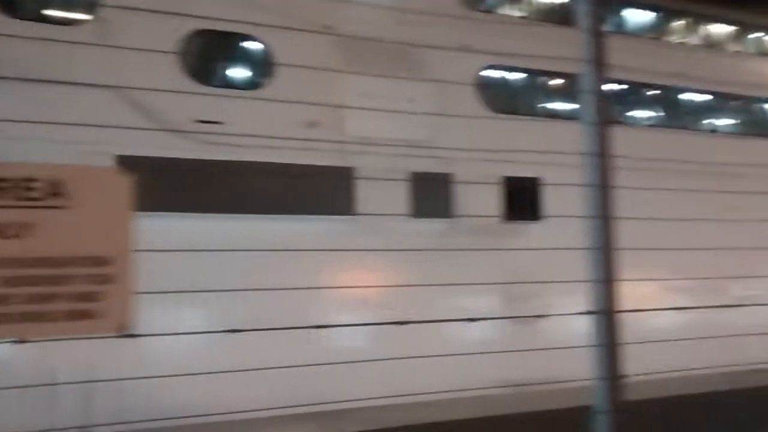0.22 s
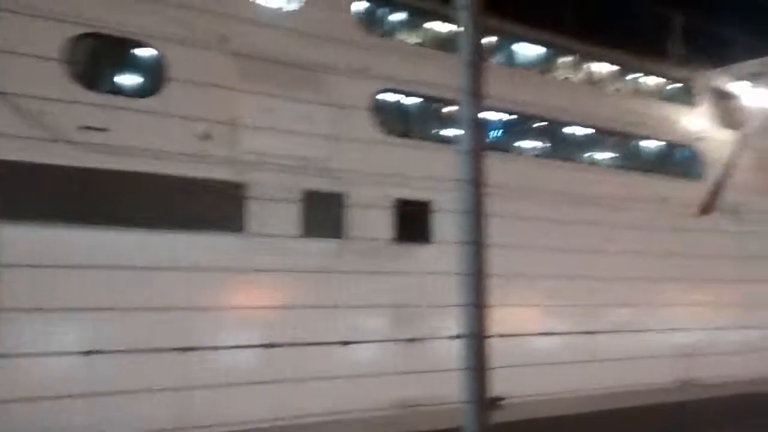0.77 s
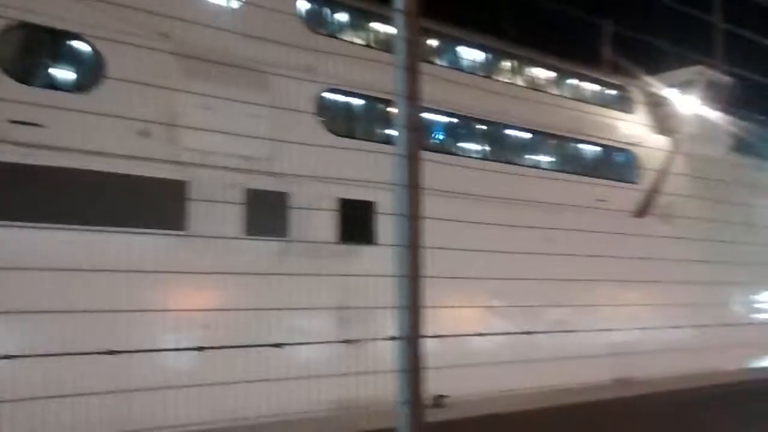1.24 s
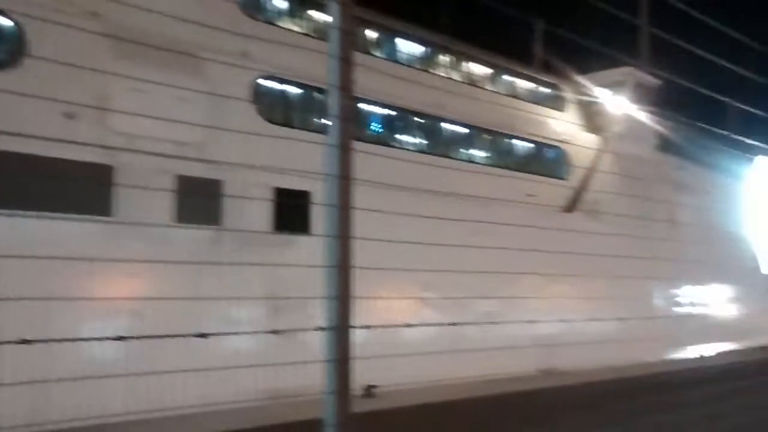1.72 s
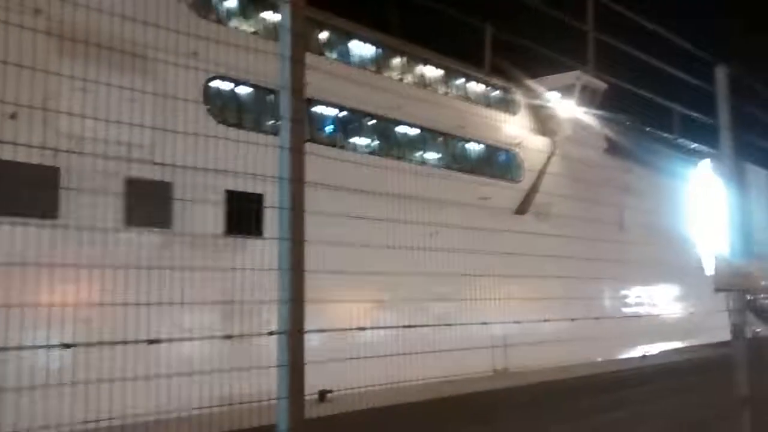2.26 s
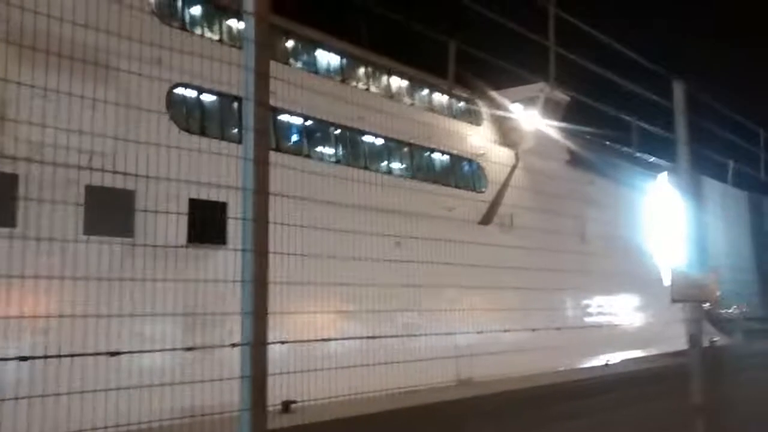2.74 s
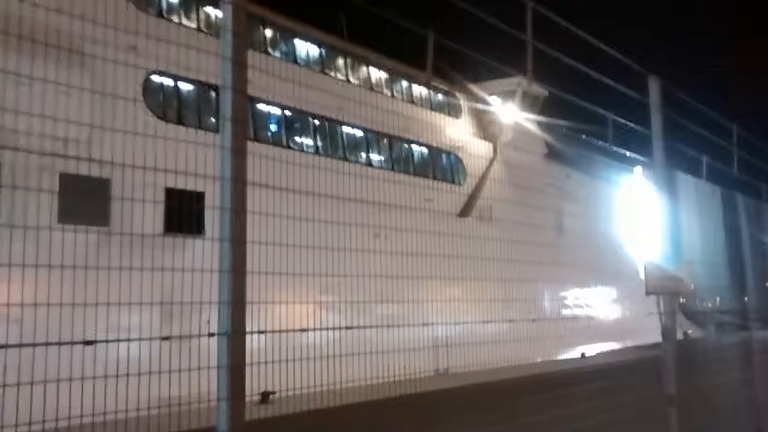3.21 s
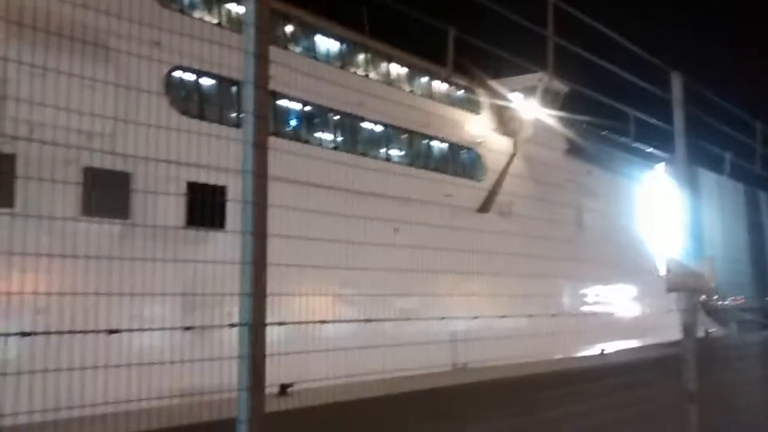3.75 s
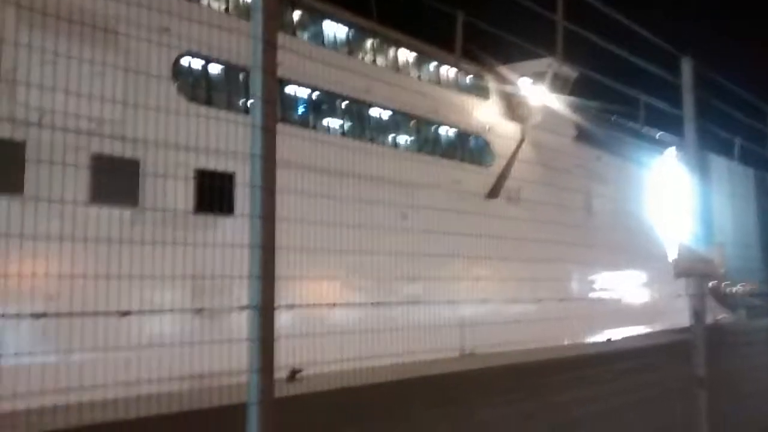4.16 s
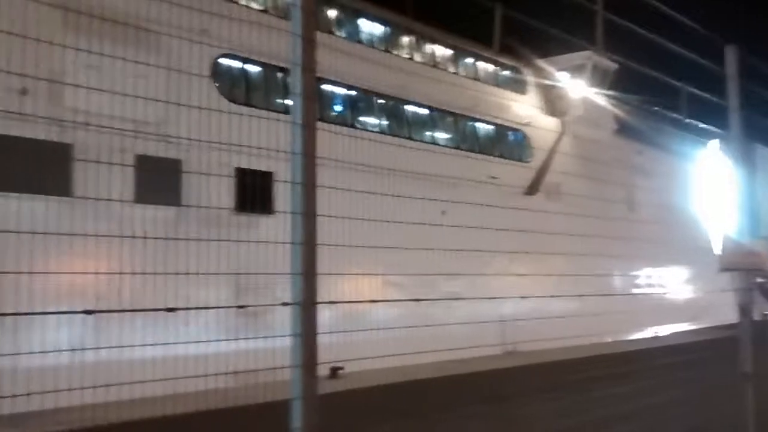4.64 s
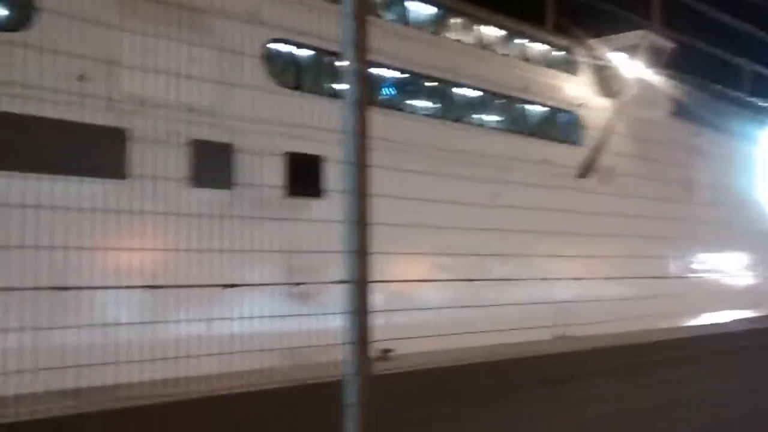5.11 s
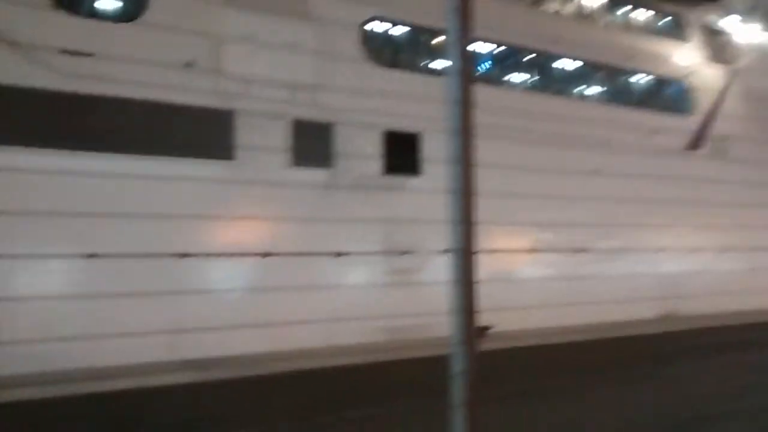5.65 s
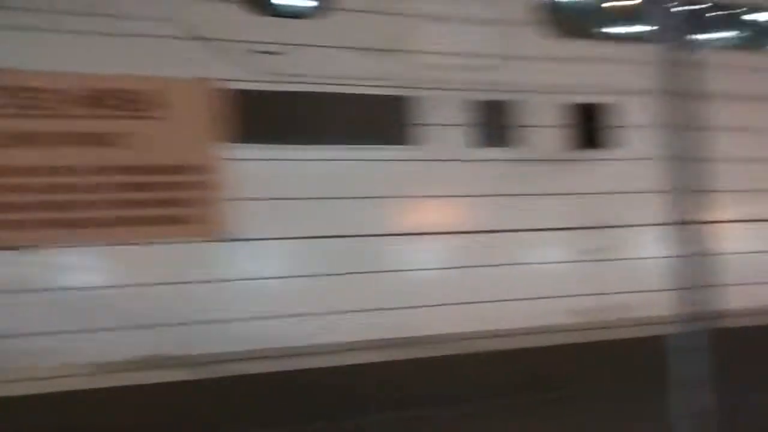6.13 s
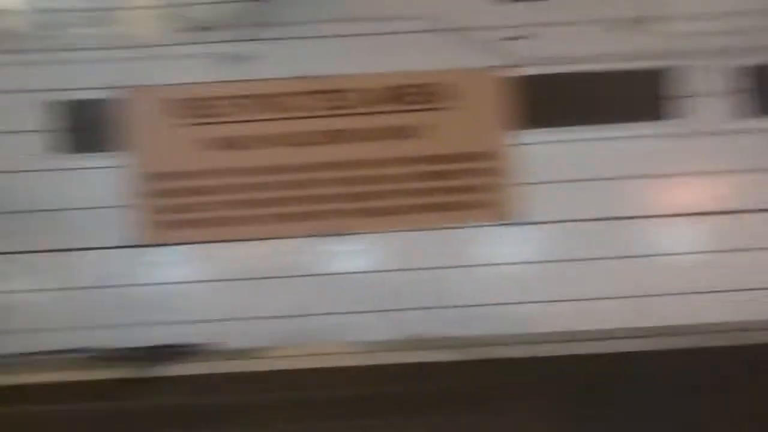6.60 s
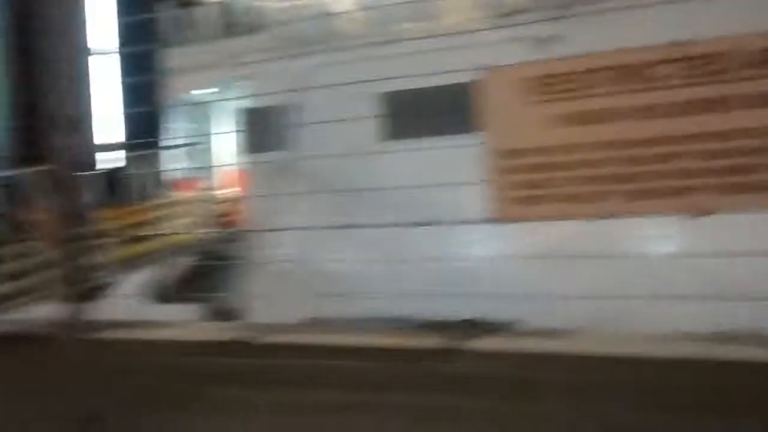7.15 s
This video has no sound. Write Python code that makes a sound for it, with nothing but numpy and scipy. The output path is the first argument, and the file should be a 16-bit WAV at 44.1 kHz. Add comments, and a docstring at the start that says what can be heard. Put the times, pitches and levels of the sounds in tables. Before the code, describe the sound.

From the start to 7.4 s, a large ship's ventilation roars without pause: dense, ducted air noise, strongest in the low and middle range, with softer hiss. Inside it sits a steady fan whine near 494 Hz and its overtones, slightly fluttering, plus faint smaller fan tones. A diesel generator hums below, mostly at 150 and 225 Hz, slowly swelling and thinning. Wind rumbles lightly on the phone's microphones; a gust begins around 0.4 s, then the strongest buffeting runs 0.9-2.0 s with hard, blunt thumps, the machinery ducking several decibels and recovering. Shorter bursts come near 3.1, 3.5, 4.4-4.6 and 6.25 s, with more rumbling and knocks at 6.9-7.4 s. The turning phone gradually shifts colour and stereo balance, brightening around 5-6 s, then abruptly becoming duller and hollower near 6.3 s as it swings back. The roar continues to the cut.

```python
"""A ferry's deck ventilation fans roar through their ducts and whine on a steady blade tone, at a quay by night.
A diesel generator hums below them: filtered noise makes the air, fluttering sine partials make the machines.
A slowly turning phone hears it, so the treble colour and stereo balance slide with its heading.
Gusts rumble and thump on the microphone ports as noise and short pressure pulses.
The phone's gain control briefly lowers the ship's sound after most of the hard thumps."""
import sys
import numpy as np
from scipy import signal
from scipy.fft import rfft, irfft
from scipy.io import wavfile
from scipy.ndimage import uniform_filter1d

SR = 44100
rng = np.random.default_rng(int(sys.argv[2]) if len(sys.argv) > 2 else 0)


def wav_record(signal):
    """Record a signal, one row per channel, as 16-bit PCM in the file named by sys.argv[1]."""
    frames = np.transpose(np.atleast_2d(signal))
    bounded = np.clip(frames, -1, 1)
    # unit amplitude maps onto the largest positive 16-bit level
    quanta = np.round(bounded * 32767).astype(np.int16)
    wavfile.write(sys.argv[1], SR, quanta)


N = 325398
TIME = np.arange(N) / SR  # seconds
FREQ = np.arange(N // 2 + 1) * SR / N  # Hz


def undb(db):
    """Decibels to gain."""
    return 10 ** (np.asarray(db) / 20)


def curves(table, at):
    """The columns of a time table, joined by straight lines."""
    s, *columns = np.transpose(table)
    return [np.interp(at, s, c) for c in columns]


def spectra(table):
    """The columns of a frequency table, joined by straight lines on a log frequency axis."""
    hz, *columns = np.transpose(table)
    return [np.interp(np.log(FREQ + 1), np.log(hz), c) for c in columns]


def bell(x, centre, width):
    """A rounded peak of height 1 and the given width at half height."""
    return .5 ** ((2 * (x - centre) / width) ** 2)


def noise(gain):
    """Noise with the given amplitude per root Hz."""
    white = rng.standard_normal(N)
    return irfft(rfft(white) * gain, N) * np.sqrt(SR / 2)


def unit(x):
    """Scale to rms 1."""
    return x / np.sqrt(np.mean(np.abs(x) ** 2))


def walk(rate):
    """Slow random wander of rms 1, smoothed above the given rate in Hz."""
    return unit(noise(1 / (1 + (FREQ / rate) ** 2)))


# Air rushing from the vents. Each row: frequency in Hz, source level in dB per Hz.
AIR_SPECTRUM = [(20, -61), (52, -49.5), (90, -53), (122, -51.5), (180, -56.5), (300, -60), (415, -55.5),
                (520, -52), (570, -52.5), (710, -56), (1200, -51.5), (1900, -55), (2700, -59), (4200, -63),
                (4750, -67.5), (5800, -79), (7400, -97), (9000, -97.5), (15000, -97.5)]
# Duct resonances on top of it. Each row: frequency in Hz, width in Hz, lift in dB.
DUCT_RESONANCES = [(305, 64, 7), (388.4, 13, 7), (457, 32, 7.5), (505.2, 63, 8.5), (593, 15, 3),
                   (805.6, 51, 9.5), (869, 43, 7), (933, 74, 5.5), (991, 53, 5.5), (1480, 80, 5),
                   (1927, 114, 3), (3470, 530, 1.5)]
# Faint treble ringing of the microphone ports. Each row: frequency in Hz, width in Hz, lift in dB.
PORT_RESONANCES = [(6450, 400, 4), (7000, 300, 3), (8150, 750, 9), (10250, 1000, 5)]
# Stereo image of the air. Each row: frequency in Hz, likeness of the channels from 0 to 1,
# left's phase lead in radians, left minus right in dB.
AIR_IMAGE = [(60, .4, 3, 0), (200, .2, .8, 0), (350, .68, .1, .5), (500, .92, 0, -.4), (1150, .98, 0, -1.6),
             (1550, .83, .5, -2.8), (2000, .7, 2.1, -4.2), (2500, .85, 2.9, -4.2), (3000, .6, 4.2, -4.5),
             (3700, .75, 6.4, -5.5), (4500, .5, 4.5, -6.5), (5200, .55, 3.7, -2), (6300, .45, 6.3, 1),
             (9000, .3, 4.8, 4)]
# Hiss from spot to spot. Each row: time in seconds, level in dB.
HISS_LEVEL = [(0, -1), (1.0, 4.5), (1.7, 1), (2.1, -0.5), (2.4, 1.3), (3.0, 0.3), (4.3, 1), (4.85, 0.4),
              (5.7, 1.9), (6.1, 2), (6.35, -4), (6.74, 3), (7.15, -0.5), (7.38, 0.5)]
# Uneven level of the low roar around 470 Hz. Each row: time in seconds, level in dB.
LOW_ROAR_LEVEL = [(0, 6.5), (.1, 0.5), (.36, 2.5), (.58, 0), (.74, 5), (.87, 2.5), (1.02, 5), (1.35, 0),
                  (2.1, 3), (2.8, 0.5), (3.2, -2.5), (3.47, 3), (3.65, -1), (3.87, 4.5), (4.05, -2),
                  (4.55, 2.5), (5.25, -1), (5.55, 4), (5.95, -1.5), (6.13, 4.5), (6.3, 1), (7.38, -0.5)]


def vents():
    """Turbulent air roars through duct resonances; low roar, body, hiss and top each flicker in level."""
    resonances = DUCT_RESONANCES + PORT_RESONANCES
    lift_db = sum(db * bell(FREQ, hz, width) for hz, width, db in resonances)
    gain = undb(spectra(AIR_SPECTRUM)[0] + lift_db)

    likeness, lead, pan_db = spectra(AIR_IMAGE)
    likeness = np.clip(likeness, 0, .99)
    mid = rfft(noise(gain * np.sqrt((1 + likeness) / 2)))
    side = rfft(noise(gain * np.sqrt((1 - likeness) / 2)))
    left = (mid + side) * undb(pan_db / 2) * np.exp(1j * lead)
    right = (mid - side) * undb(-pan_db / 2)
    both = np.array([left, right])

    # split into bands that add back to the whole
    low_roar = bell(FREQ, 470, 206)
    above_2600 = 1 / (1 + (2600 / (FREQ + 1)) ** 8)
    top = 1 / (1 + (6500 / (FREQ + 1)) ** 8)
    body, hiss = 1 - low_roar - above_2600, above_2600 - top
    hiss_db, = curves(HISS_LEVEL, TIME)
    low_roar_db, = curves(LOW_ROAR_LEVEL, TIME)
    bands = (low_roar, low_roar_db), (body, 0), (hiss, hiss_db), (top, 0)
    flicker_db, flicker_hz = .6, 24
    return sum(irfft(both * share, N) * undb(db + flicker_db * walk(flicker_hz)) for share, db in bands)


def tones(base_hz, partials, drift, flutter_hz):
    """Partials share one drifting speed; each flutters in level and phase, and grows or fades steadily."""
    angle = 2 * np.pi * np.cumsum(base_hz * (1 + drift * walk(1.36))) / SR
    halves = np.array([[.5], [-.5]])  # left and right each take half of a stereo difference
    out = 0
    for multiple, db, pan_db, lead, flutter, growth in partials:
        wander = unit(walk(flutter_hz) + 1j * walk(flutter_hz))
        swirl = unit(1 + flutter * wander) * undb(growth * (TIME - TIME.mean()))
        ears = undb(db + pan_db * halves) * np.exp(1j * lead * halves)
        out = out + np.sqrt(2) * np.real(ears * swirl * np.exp(1j * multiple * angle))
    return out


BLADE_HZ = 494.0  # mean rate of blades passing
# Fan blade tone. Each row: multiple of the blade rate, source level in dB, left minus right in dB,
# left's phase lead in radians, flutter share, growth in dB per second.
BLADE_PARTIALS = [(1, -30.2, 1, -.2, .25, -.3), (2, -27.8, 0, -.1, .03, 0), (3, -36.5, -1.5, .1, .7, .4),
                  (4, -38.7, -4, 1.7, .4, 1), (5, -41.5, -3, 2.5, .4, 0)]
# Smaller fans. Each row: frequency in Hz, source level in dB, left minus right in dB,
# left's phase lead in radians, flutter share, growth in dB per second.
SMALL_FAN_TONES = [(394.8, -41.5, -1, 0, .2, 1.6), (805.5, -44, 0, 0, .8, 0), (938.7, -42, 0, 0, .4, 0),
                   (1195, -45, -1, 0, .8, 0)]
# Uneven rise and fall of the blade whine. Each row: time in seconds, level in dB.
WHINE_LEVEL = [(0, -3), (1.2, -0.5), (1.7, -4.5), (2.2, 2.5), (3, 1), (3.65, 0.5), (4.27, 0.5),
               (4.68, -0.5), (4.92, -0.5), (5.7, -1), (6.03, -6), (6.4, 0.5), (6.8, 1), (7.05, -0.5),
               (7.38, -1.5)]


def fans():
    """Passing blades chop the air into a harmonic whine; smaller fans add single tones."""
    whine_db, = curves(WHINE_LEVEL, TIME)
    whine = tones(BLADE_HZ, BLADE_PARTIALS, drift=.0002, flutter_hz=5) * undb(whine_db)
    return whine + tones(1, SMALL_FAN_TONES, drift=.001, flutter_hz=5)


FIRING_HZ = 75.04  # mean firing rate of the diesel
# Generator hum. Each row: multiple of the firing rate, source level in dB, left minus right in dB,
# left's phase lead in radians, flutter share, growth in dB per second.
DIESEL_PARTIALS = [(1, -40.5, 0, .3, .15, .3), (2, -37, 3, .4, .1, .2), (3, -30.7, 7, 1.1, .02, .2),
                   (10 / 3, -39.3, 7, .7, .15, .4), (11 / 3, -46, 5, .9, .2, 0),
                   (23 / 6, -42.5, 5, .9, .2, 0), (6, -36, 8, .3, .2, 0), (9, -43, 8, .3, .2, 1)]
# Rise and fall of the hum along the quay from standing waves. Each row: time in seconds, level in dB.
HUM_LEVEL = [(0, 1), (.65, -6.5), (1.6, 1.5), (3.1, -4.5), (4.15, 1.7), (4.75, -3), (5.7, -1.7), (6.6, -1),
             (7.38, 0)]


def generator():
    """The diesel's firing pulses sound as partials that rise and fall with standing waves."""
    hum_db, = curves(HUM_LEVEL, TIME)
    return tones(FIRING_HZ, DIESEL_PARTIALS, drift=.0004, flutter_hz=2) * undb(hum_db)


# Slow swell of the ship on its way over the quay. Each row: time in seconds, level in dB.
SHIP_SWELL = [(0, 0), (.2, 0), (.36, 2), (1.1, -1.17), (3.1, 1.1), (4.0, 0.75), (5.25, -0.1), (5.73, 1.5),
              (6.1, 1), (7.38, -0.07)]


def ship():
    """Vents, fans and generator swell together, lowered by the gain control and heard by the turning phone."""
    swell_db, = curves(SHIP_SWELL, TIME)
    machines = vents() + fans() + generator()
    return turning(machines * undb(swell_db - gain_dips()))


DIP_ATTACK_S, RECOVERY_DB_PER_S = .01, 10
# Hard eddies, for the gain dips here and the thumps in wind(). Each row: time in seconds, peak in dB,
# push +1 or suction -1 on the right port, depth of the gain dip in dB (no dip at 0 or below).
HARD_EDDIES = [(.533, -9, 1, 2.5), (.952, -6, 1, 1.9), (1.030, -3, 1, 1), (1.141, -11, -1, 1.5),
               (1.153, -11, 1, 1), (1.167, -4, 1, 1.5), (1.25, -2, 1, 6), (1.302, -8, 1, 4),
               (1.396, -8, 1, 5), (1.49, -6, 1, 4.5), (1.574, -2, 1, 6.5), (1.588, -2.5, 1, 6.5),
               (1.634, -5.5, 1, 7), (1.889, -2.5, 1, 7), (1.897, -1.5, 1, 8.5), (1.981, -8, 1, 8),
               (3.131, -9, -1, -2), (3.138, -9, 1, -1), (3.544, -8, 1, 4), (3.547, -5, -1, 4.5),
               (4.382, -8, 1, 0), (4.408, -8, 1, 2.5), (4.499, -6, 1, 3.5), (4.523, -7, 1, 3),
               (4.573, -14, 1, 2.5), (6.252, -6, 1, 0.5), (7.153, -12, 1, -0.5), (7.202, -5, -1, -1.5),
               (7.318, -6.5, 1, 1.5)]


def gain_dips():
    """Decibels the phone's gain control takes off: quick drops, steady recovery; the deepest dip rules."""
    losses = []
    for s, _, _, dip_db in HARD_EDDIES:
        onset = np.clip((TIME - s) / DIP_ATTACK_S, 0, 1)
        losses.append(onset * np.maximum(dip_db - RECOVERY_DB_PER_S * (TIME - s), 0))
    return np.max(losses, axis=0)


# Peaks and notches tied to the phone's pose. Each row: strongest at heading in degrees, spread in degrees,
# frequency there in Hz, slide in Hz per degree, width in Hz, left in dB, right in dB.
POSE_COLOURS = [(32, 90, 1830, -5, 400, -3, 1.5), (-40, 44, 2700, -13, 330, -7, -2.5),
                (36, 24, 5350, -2, 1100, 2.5, -8.5), (35.5, 34, 2340, 3, 1300, 1, 3),
                (7, 27, 1880, 0, 650, -.5, -4.5), (12.5, 20, 3420, -12, 470, -5, -6),
                (39, 20, 6770, 3, 810, 9.5, 6), (-41, 20, 6800, 0, 1300, 9, 10),
                (25.5, 11, 2850, 3, 390, -2.5, -2.5), (-36, 18, 310, 5, 120, 2, 4)]


def pose_db(f, heading):
    """Colour of each port in dB: peaks and notches fade and slide as the phone turns from their pose."""
    total = 0
    for best, spread, hz, slide, width, left_db, right_db in POSE_COLOURS:
        strength = bell(heading, best, spread)
        shape = bell(f, hz + slide * (heading - best), width)
        total = total + np.multiply.outer([left_db, right_db], strength * shape)
    return total


def ripple(shape):
    """Echoes off hull and quay add and cancel: a fine random pattern over frequency that shifts slowly."""
    field = rng.standard_normal(shape)
    for _ in range(2):
        field = uniform_filter1d(field, size=3, axis=0)  # over frequency
        field = uniform_filter1d(field, size=70, axis=1)  # over time
    return unit(field)


HOLLOW_HZ, HOLLOW_DEG_PER_OCTAVE = 2170, 56.5  # right port, at heading 0; rises with the heading
LIFT_HZ, LIFT_DEG_PER_OCTAVE = 1840, 63  # left port, at heading 0; falls with the heading
LIFT_DB, LIFT_DB_PER_DEG = 4.5, -.17
LAG_MS, LAG_MS_PER_DEG = .048, -.001  # left port's lag near 500 Hz, less elsewhere
PAN_DB = -.75  # left minus right at heading 0
# The phone turns one way, then back and well past its start. Each row: time in seconds,
# heading in degrees, hollow on the right in dB, upper middle of the sound shared by both ports in dB.
PHONE_TURN = [(0, -5, -5, 0.5), (.5, 10, -7, 4), (1.1, 18.5, -8, 5), (2, 26, -4.5, 0), (3.5, 34, 2, -3),
              (4.6, 27, -3, -1), (5.2, 27, -5.5, 3), (6.15, 8, -7, 5), (6.36, -10, -1, -6.5),
              (6.8, -28.5, -14.5, -1.5), (7.38, -41, -6, -1)]
# The phone's body shades one port. Each row: frequency in Hz, left minus right in dB per degree of heading.
BODY_SHADE = [(250, 0.0641), (480, 0.168), (900, 0.11), (1400, -0.0256), (2000, 0.0635), (2800, 0.1532),
              (5000, -0.0179)]


def turning(x, size=1024):
    """Sound bends round the phone: a hollow and a lift slide with heading, and balance and lag shift."""
    f, t, frames = signal.stft(x, SR, nperseg=size)
    f = f[:, None]
    heading, hollow_db, shared_db = curves(PHONE_TURN, t)
    hollow_hz = HOLLOW_HZ * 2 ** (heading / HOLLOW_DEG_PER_OCTAVE)
    lift_hz = LIFT_HZ * 2 ** (-heading / LIFT_DEG_PER_OCTAVE)
    lift_db = LIFT_DB + LIFT_DB_PER_DEG * heading
    shade_hz, db_per_deg = np.transpose(BODY_SHADE)
    pan_db = PAN_DB + np.interp(f, shade_hz, db_per_deg) * heading

    shared = frames.mean(axis=0)
    left, right = frames + shared * (undb(shared_db * bell(f, 2530, 1880)) - 1)
    lag_s = (LAG_MS + LAG_MS_PER_DEG * heading) / 1000 * bell(f, 500, 2200)
    left = left * np.exp(-2j * np.pi * f * lag_s)
    left = left * undb(lift_db * bell(f, lift_hz, 1060) + pan_db / 2)
    right = right * undb(hollow_db * bell(f, hollow_hz, 580) - pan_db / 2)

    ripple_db = 1.1 * np.minimum(f / 2000, 1) * ripple(shared.shape)
    coloured = np.array([left, right]) * undb(ripple_db + pose_db(f, heading))
    return signal.istft(coloured, SR, nperseg=size)[1][:, :N]


GUST_ATTACK_S, GUST_RELEASE_S = .052, .06
# Gusts over a light breeze. Each row: start in seconds, length in seconds, strength in dB.
GUST_TIMES = [(.41, 0.32, -23.5), (.9, 0.44, -16.5), (1.408, 0.18, -20), (3.01, 0.12, -19),
              (3.43, 0.11, -22), (4.366, 0.18, -22), (5.68, 0.056, -27), (6.065, 0.31, -25.5),
              (6.854, 0.67, -21.5)]


def gusts():
    """Strength of the gusts: each rises, holds and falls away."""
    strength = 0
    for s, length, db in GUST_TIMES:
        corners = [s - GUST_ATTACK_S, s, s + length, s + length + GUST_RELEASE_S]
        strength = strength + undb(db) * np.interp(TIME, corners, [0, 1, 1, 0])
    return strength


# Colour of the wind rumble. Each row: frequency in Hz, relative level in dB.
RUMBLE_COLOUR = [(8, -10), (25, -7), (70, 5.5), (140, 2.5), (250, -7), (450, -17), (1000, -36), (3000, -76)]


def ports(opposed):
    """Wind noise pushes the two ports oppositely by a share of its power, a little more on the right."""
    gain = undb(spectra(RUMBLE_COLOUR)[0])
    common, left, right = (unit(noise(gain)) for _ in range(3))
    against = np.sqrt(opposed) * np.array([common, -common])
    separate = np.sqrt(1 - opposed) * np.array([left, right])
    return (against + separate) * undb([[-.3], [.3]])


PORT_LEAK_HZ = 75  # corner below which a push leaks away
FAR_PORT_DB, FAR_PORT_S = -3.7, .00055  # the left port feels it reversed, weaker and later


def thumps(pushes, length_s):
    """Each eddy is one rounded pressure pulse with an undershoot, opposite on the two ports."""
    pulse = np.exp(-(np.pi * FREQ * length_s) ** 2 / np.log(16))  # length_s wide at half height
    response = pulse * 1j * FREQ / (1j * FREQ + PORT_LEAK_HZ)
    right = rfft(pushes) * response / irfft(response, N).max()
    left = -right * undb(FAR_PORT_DB) * np.exp(-2j * np.pi * FREQ * FAR_PORT_S)
    return irfft(np.array([left, right]), N)


BREEZE_DB = -33.3  # floor of the flow, on the scale of the gust strengths
CHURN_DB, CHURN_HZ = 3, 23  # how much and how fast the rumble wavers
SMALL_EDDY_DB, SMALL_EDDIES_PER_S = 4, 70  # spread relative to gust strength, mean rate
SMALL_EDDY_S, HARD_EDDY_S = .002, .0016  # the hard eddies are shorter, so they knock higher


def wind():
    """Breeze and gusts rumble; small eddies patter inside the gusts, and the hard ones thump."""
    gust = gusts()
    flow = np.maximum(gust, undb(BREEZE_DB))
    rumble = ports(opposed=.86) * flow * undb(CHURN_DB * walk(CHURN_HZ) - 4)
    arrivals = rng.random(N) < SMALL_EDDIES_PER_S / SR
    small = arrivals * rng.standard_normal(N) * gust * undb(SMALL_EDDY_DB)
    hard = np.zeros(N)
    for s, db, direction, _ in HARD_EDDIES:
        hard[int(s * SR)] += np.sign(direction) * undb(db)
    return rumble + thumps(small, SMALL_EDDY_S) + thumps(hard, HARD_EDDY_S)


def scene():
    """The ship and the wind."""
    return ship() + wind()


TOP_HZ = 15050  # upper edge of the phone's band


def record(dry):
    """The phone rounds the highest peaks, fades in over 4 ms and cuts the top."""
    rounded = dry / (1 + dry ** 10) ** (1 / 10)
    fade = np.minimum(TIME / .004, 1)
    low_pass = signal.ellip(10, .1, 70, TOP_HZ, fs=SR, output="sos")
    return signal.sosfilt(low_pass, rounded * fade)


dry = scene()
out = record(dry)
wav_record(out)
```